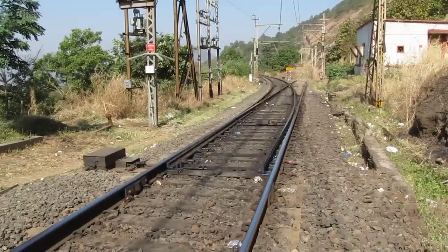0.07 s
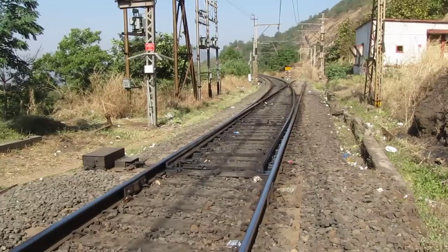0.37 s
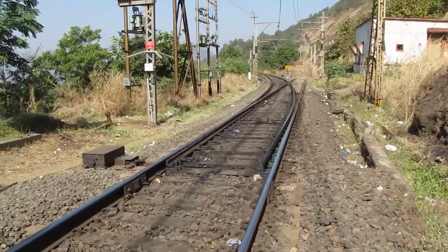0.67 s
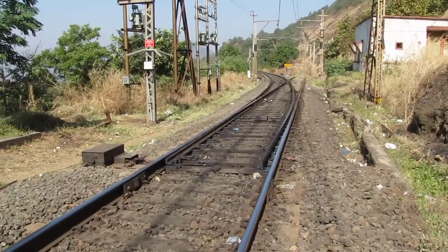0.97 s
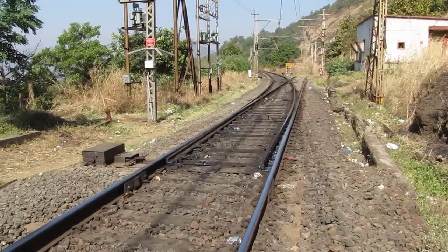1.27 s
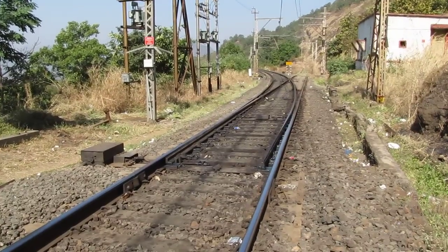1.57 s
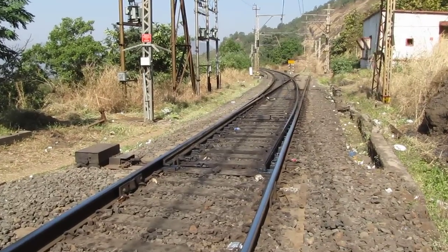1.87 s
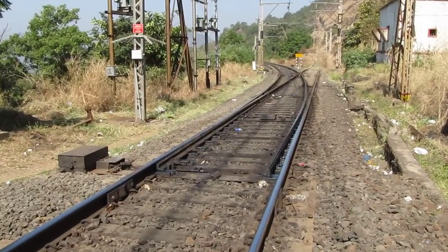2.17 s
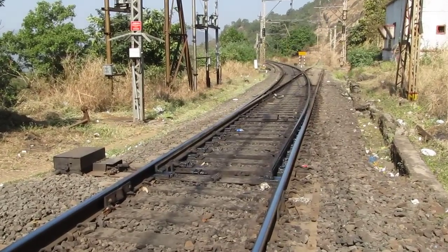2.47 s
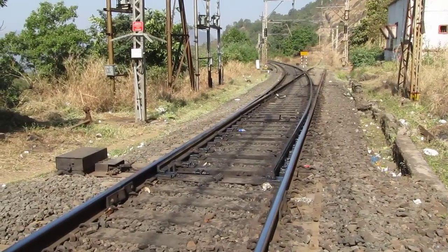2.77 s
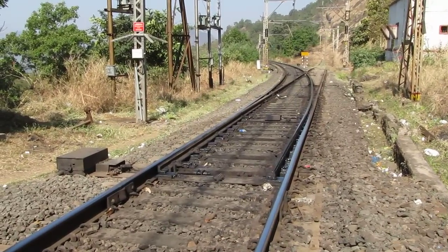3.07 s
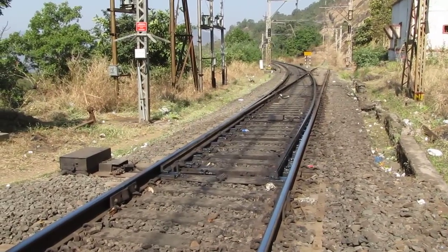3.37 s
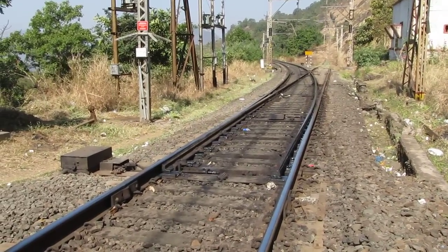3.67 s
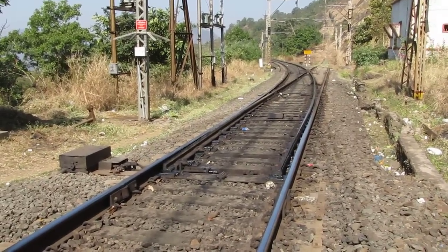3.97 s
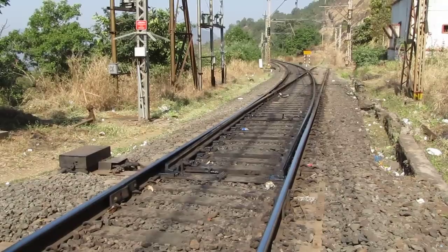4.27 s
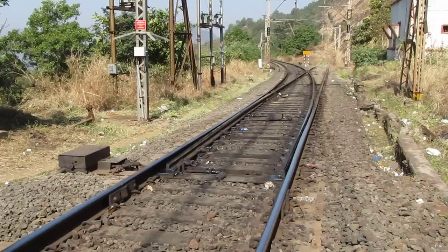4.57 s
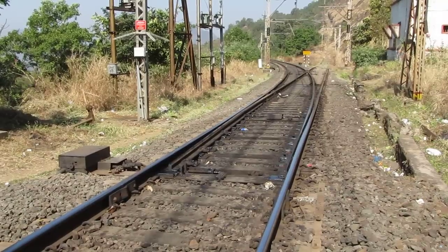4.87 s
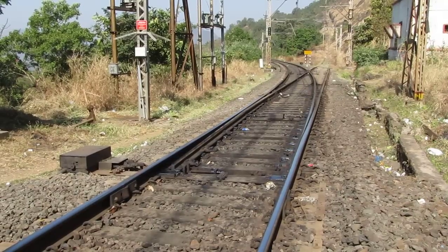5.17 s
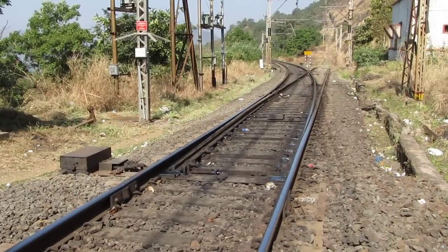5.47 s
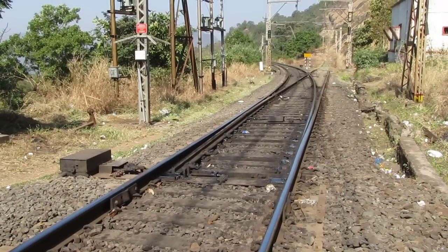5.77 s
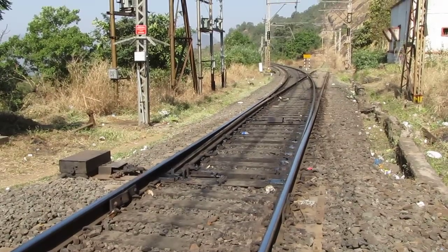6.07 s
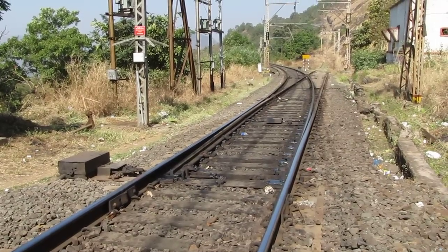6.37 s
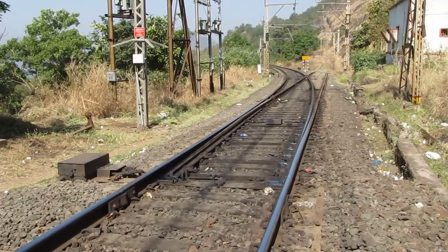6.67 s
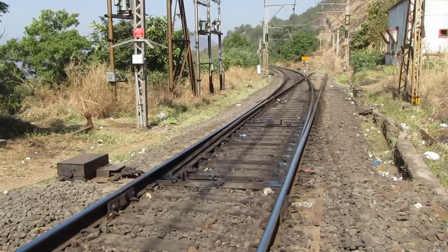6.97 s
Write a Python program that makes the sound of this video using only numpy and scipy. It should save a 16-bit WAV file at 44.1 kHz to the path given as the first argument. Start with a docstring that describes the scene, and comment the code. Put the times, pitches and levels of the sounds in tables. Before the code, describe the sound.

A motorised track switch whirs, labours and locks with steel clacks, over quiet open air, light wind and a bird's rising chirps.

```python
"""At a railway switch in open country, an electric point machine throws the blades: its geared motor runs
up, unlocks them, labours as it drags them across, locks them and is cut off with a steel clack. Meshing
teeth whine, brushes hiss, and the blows of lock and rods ring the steel and thud into the case.
A bird repeats a rising whistle. Underneath lie distant air, insects, rustling grass, mains hum,
breeze on the microphone and a few small handling ticks."""
import sys
import numpy as np
from scipy import signal
from scipy.fft import rfft, irfft, next_fast_len
from scipy.io import wavfile
from scipy.ndimage import uniform_filter1d, map_coordinates

SR = 44100
rng = np.random.default_rng(int(sys.argv[2]) if len(sys.argv) > 2 else 0)


def put_to_file(sound):
    """Save the sound as 16-bit audio at rate SR, in the file named by the first command-line argument."""
    columns = np.atleast_2d(sound).T  # one column per channel
    safe = np.clip(columns, -1, 1)
    whole_steps = np.round(safe * 32767)
    wavfile.write(sys.argv[1], SR, whole_steps.astype(np.int16))


N = 310023
TIME = np.arange(N) / SR
EARS = np.array([[0.5], [-0.5]])  # left and right share of a level or phase offset

# modes of the sheet cover: (frequency [Hz], width [Hz], level [dB])
COVER_MODES = [(1337, 59, 1.5), (1520, 98, 4.5), (2430, 84, -7), (2770, 140, 2.5), (3246, 148, 4.5),
               (4000, 285, -0.5), (4830, 62, -4.5), (5490, 29, 3), (6200, 40, -11), (6720, 50, -9)]
# modes of the case and sleepers: (frequency [Hz], width [Hz], level [dB])
CASE_MODES = [(96.5, 44, -3), (155, 114, -2.5), (216.4, 74.5, 1.5), (239.2, 29.8, 4), (300, 25, -6),
              (360, 18.4, -1), (509, 95, -12.5)]
# blows of lock and rods, levels relative: (time [s], strength [dB], thud [dB],
# treble against strength [dB], chatter [s], case ring [dB])
BLOWS = [(2.919, -32.5, -40, -44, 0.0061, -54), (2.977, -25, -56, -12.5, 0.0013, -58),
         (3.032, -34.5, -48, -49, 0.0032, -38), (3.598, -29, -44, -24, 0.0027, -43.5),
         (5.274, -30.5, -41, -45, 0.004, -67), (5.295, -30, -60, -32, 0.004, -62),
         (5.336, -35.5, -66, -44, .0046, -42.5), (5.377, -42, -61, -28, .003, -62),
         (5.518, -27, -45, -5, 0.0091, -42)]


def amp(db):
    """Decibels to gain."""
    return 10 ** (np.asarray(db) / 20)


def unit(x):
    """Scale to rms 1."""
    return x / np.sqrt(np.mean(x ** 2) + 1e-20)


def along(points, hz):
    """Read (frequency [Hz], value) points on a log axis."""
    freqs, values = np.transpose(points)
    return np.interp(np.log(hz + 1), np.log(np.abs(freqs) + 1), values)


def wobble(rate):
    """A smooth random curve, rate knots a second."""
    return map_coordinates(rng.standard_normal(int(N * rate / SR) + 4), [TIME * rate])


def filtered(x, response):
    """Filter x by a complex response of frequency."""
    size = next_fast_len(N + SR // 2)
    return irfft(rfft(x, size) * response(np.fft.rfftfreq(size, 1 / SR)), size)[..., :N]


def noise(spectrum):
    """Noise of rms 1, coloured by (frequency [Hz], level [dB]) points."""
    return unit(filtered(rng.standard_normal(N), lambda hz: amp(along(spectrum, hz))))


def resonate(x, modes):
    """Play x through a body's resonances, alternating in polarity."""
    return filtered(x, lambda f: sum((-1) ** k * amp(db) * 1j * f * width / (hz**2 - f**2 + 1j * f * width)
                                     for k, (hz, width, db) in enumerate(modes)))


def ringing(modes):
    """Resonant noise of rms 1."""
    return unit(resonate(rng.standard_normal(N), modes))


def add(track, start, sound):
    """Mix a sound into a track at start seconds."""
    part = track[round(start * SR):][:len(sound)]
    part += sound[:len(part)]


def fall(t, t60, attack, hold=0):
    """Envelope of a blow: it rises, and decays after hold seconds."""
    return amp(-60 * np.maximum(t - hold, 0) / t60) * (1 - np.exp(-t / attack))


def spread(a, b, likeness):
    """Mix two unrelated sounds to a stereo pair of given left-right likeness."""
    angle = lambda hz: np.arccos(np.clip(along(likeness, hz), -1, 1)) / 2
    mid, side = filtered(np.array([a, b]), lambda hz: np.array([np.cos(angle(hz)), np.sin(angle(hz))]))
    return np.array([mid + side, mid - side])


def echoes(x):
    """Diffuse answer of ballast, bank and trees; both ears hear nearly the same bass."""
    # outdoor decay: (frequency [Hz], t60 [s])
    decay = [(200, 0.9), (1500, 0.65), (4500, 0.4), (7500, 0.38), (12000, 0.1)]
    # stereo image: (frequency [Hz], left-right likeness [-1..1])
    likeness = [(400, 0.97), (1200, 0.97), (2500, 0.12), (5000, 0)]
    hz, t, bands = signal.stft(rng.standard_normal((2, SR // 2)), SR, nperseg=256)
    bands *= fall(t, along(decay, hz)[:, None], attack=0.014)
    tail = signal.istft(bands, SR, nperseg=256)[1]
    wet = signal.fftconvolve(x[None], tail / np.linalg.norm(tail[0]), axes=1)[:, :N]
    return spread(*wet, likeness)


def distant_air():
    """A wide, gently breathing bed of far-off air."""
    # colour of the air: (frequency [Hz], level [dB])
    colour = [(53, -32), (90, 8.5), (107, -10), (124, -12.5), (289, -10), (400, -15.5), (436, -12.5),
              (508, -12), (658, -8.5), (930, -13.5), (1210, -17), (2210, -20.5), (4610, -24.5), (5600, -25),
              (15800, -45.5)]
    # stereo image: (frequency [Hz], left-right likeness [-1..1])
    likeness = [(60, -0.86), (150, 1), (380, 0.72), (950, 0.73), (2380, 0.062), (5980, -0.62),
                (15000, 0.22)]
    return amp(-64.5 + 0.43 * wobble(2.28)) * spread(noise(colour), noise(colour), likeness)


def insects():
    """A thin drone in one narrow, high band."""
    return amp(-86.5) * np.array([ringing([(5690, 120, 0)]) for ear in range(2)])


def mains_hum():
    """One steady low tone, mostly on the left."""
    return np.sqrt(2) * np.sin(2 * np.pi * 49.75 * TIME) * amp([[-47], [-64]])


def grass():
    """Dry grass is brushed aside: a high swish, then a longer rustle of stalks."""
    # colours of the swish and the stalks: (frequency [Hz], level [dB])
    swish_colour = [(1000, -31), (3700, -19), (4600, 14), (5300, -7), (6500, -21), (15000, -34)]
    stalk_colour = [(400, -14), (1200, -2.5), (2900, 0), (3800, -6), (5000, -12), (15000, -42)]
    since = np.maximum(TIME - 0.885, 0)
    swish = amp(-71) * fall(since, t60=0.99, attack=0.02)
    stalks = amp(-56.5) * fall(since, t60=1.7, attack=0.16)
    flicker = amp(1.3 * wobble(90))
    rustle = [swish * noise(swish_colour) + stalks * noise(stalk_colour) for ear in range(2)]
    return flicker * np.array(rustle)


def breeze():
    """A light draught never stops; gusts swell, fade and buffet mostly the left microphone port."""
    # gusts: (peak time [s], half width [s], relative level [dB])
    gusts = [(1.15, 0.18, -55), (1.52, 0.069, -64), (3.9, .3, -68), (4.88, 0.083, -56), (5.13, 0.07, -58),
             (5.932, 0.016, -47), (6.09, 0.067, -42.5), (6.6, 0.22, -56), (6.92, .09, -45.5)]
    # colours of buffeting and draught: (frequency [Hz], level [dB])
    buffet_colour = [(12, -48), (20, 2.5), (43, -1), (93, 0), (201, -19), (270, -25.5), (303, -34),
                     (499, -42), (600, -48), (780, -85), (1320, -120)]
    draught_colour = [(15, -3.5), (35, -15.5), (70, 11.5), (140, -15.5), (400, -54), (1500, -120)]
    swell = sum(amp(db) * np.exp(-((TIME - peak) / width) ** 2 / 2) for peak, width, db in gusts)
    left, right = [unit(noise(buffet_colour) * amp(2.1 * wobble(18))) for port in range(2)]
    draught = amp([[-66], [-76]]) * np.array([noise(draught_colour) for port in range(2)])
    return draught + swell * np.array([amp(9) * left, amp(-23.5) * right + amp(-16) * left])


def handling_ticks():
    """Dry little clicks with a brief hollow ring; each contact's ring balance sets how much of it rings and how
    much snaps."""
    # contacts: (time [s], relative level [dB], ring pitch [Hz], ring balance [dB])
    contacts = [(1.013, -48, 1170, -7), (1.266, -56, 1160, -6), (1.368, -45.5, 900, -4),
                (1.696, -51, 1180, -4.5), (2.283, -46.5, 896, -4.5), (2.417, -50, 1212, 1),
                (5.847, -55, 1550, -21)]
    # colour of the snap: (frequency [Hz], level [dB])
    snap_colour = [(300, 5), (800, 7), (2000, 0.5), (3300, 0), (4700, -5.5), (6000, -19), (15000, -33)]
    t = np.arange(SR // 5) / SR
    snap, ring = np.zeros((2, N))
    for start, db, hz, ring_db in contacts:
        hardness = 1 - 0.95 * amp(2 * ring_db)
        add(snap, start, amp(db + 1) * hardness * fall(t, t60=0.03, attack=0.0007))
        phase = 2 * np.pi * hz * t + 0.63 * wobble(200)[:len(t)]
        add(ring, start, amp(db + ring_db + 5) * fall(t, t60=0.045, attack=0.002) * np.sin(phase))
    return snap * noise(snap_colour) + ring


def bird():
    """A buzzy lead-in slides up into a clean whistle that echoes from the trees."""
    # calls, levels relative: (time [s], length [s], whistle [dB], loudest point [share of length],
    # buzz [0..1], lead-in [dB], lead-in pitch [Hz], glide knee [share of length], knee pitch [Hz])
    calls = [(1.813, 0.13, -55.5, .55, 1, -65.5, 4010, 0.87, 5150),
             (2.976, .12, -55, 0.94, .25, -74, 4240, 0.72, 4910),
             (4.24, 0.17, -56, 0.27, 0.4, -65, 3950, .5, 5000),
             (5.161, .125, -51, 0.5, 0.5, -72, 4305, .7, 5030),
             (6.654, 0.12, -53, 0.37, 0.46, -57, 4390, .5, 4880)]
    lead_s, swell_s, release_s, taper_db = 0.05, 0.018, 0.01, 9.5
    start_hz, top_hz = 4370, 5480
    trill_rate, trill_depth_hz, rasp_depth_hz = 85, 187, 190
    song = np.zeros(N)
    for start, length, db, loudest, buzz, lead_db, lead_hz, knee, knee_hz in calls:
        t = np.arange(-lead_s, length, 1 / SR)
        onset = np.clip(t / swell_s + 0.5, 0, 1)
        progress = np.clip(t / length, 0, 1)
        rough = 1 - onset + onset * buzz * (1 - progress)
        glide_hz = np.interp(progress, [0, knee, 0.88], [start_hz, knee_hz, top_hz])
        pitch_hz = lead_hz * (1 - onset) + onset * glide_hz
        trill = trill_depth_hz * np.sin(2 * np.pi * trill_rate * t)
        rasp = rasp_depth_hz * wobble(1100)[:len(t)]
        phase = 2 * np.pi * np.cumsum(pitch_hz + rough * (trill + rasp)) / SR
        voice = np.sin(phase) + amp(-37) * np.sin(3 * phase)
        lead_in = amp(lead_db) * (1 + t / lead_s) * (1 - onset)
        taper = np.interp(progress, [0, loudest, 1], [1, 0, 1])
        whistle = amp(db - taper_db * taper ** 2) * onset * np.clip((length - t) / release_s, 0, 1)
        flicker = amp((2.1 + 1.2 * rough) * wobble(200)[:len(t)])
        add(song, start - lead_s, np.sqrt(2) * (lead_in + whistle) * flicker * voice)
    direct = filtered(song, lambda hz: amp(EARS * 0.5) * np.exp(1j * EARS * hz / 4500))
    return direct + amp(-12) * echoes(song)


def running(t60):
    """Envelope of the gear train: it starts, runs, and dies away once the current is cut."""
    switch_on_s, run_up_s, cut_off_s = 2.5, 0.18, 5.52
    run_up = np.clip((TIME - switch_on_s) / run_up_s, 0, 1)
    return run_up * amp(-60 * np.maximum(TIME - cut_off_s, 0) / t60)


def stage_levels(blend_s=0.13):
    """Level curves of the motor's layers, crossfaded through the stages of the throw."""
    # run-up, unlocking, running free, taking up the blades, dragging, straining, sliding home, locking;
    # levels relative: (start [s], grinding [dB], brushes [dB], rumble [dB], mesh tones 1, 2, 3 [dB])
    stages = [(2.5, -63, -75.5, -60.5, -0.5, -8, -7.5), (2.78, -58, -64, -66.5, -1.5, 4, 4.5),
              (3.12, -58, -67.5, -67, -5, 1.5, -6), (3.6, -55, -67.5, -62, 3.5, 6.5, 1.5),
              (3.819, -62, -71.5, -66.5, -0.5, -1.5, -1), (4.33, -63, -72, -67, -1.5, -1, 1.5),
              (4.64, -61.5, -73.5, -65.5, -1, -3.5, -1), (5.17, -55.5, -63, -62, -1.5, -0.5, 3.5)]
    starts, *levels = np.transpose(stages)
    stage = np.maximum(np.searchsorted(starts, TIME) - 1, 0)
    return [uniform_filter1d(db[stage], int(blend_s * SR)) for db in levels]


def grinding():
    """Tiny irregular tooth and brush contacts ring the cover and shake the case."""
    # colours of teeth and motor brushes: (frequency [Hz], level [dB])
    tooth_colour = [(260, -44), (450, -38.5), (573, -9), (624, -13), (662, -9), (728, -18.5), (794, -11),
                    (1100, -21.5), (1260, -19.5), (1590, -15.5), (1730, -14.5), (2380, -13.5), (3270, -51),
                    (3570, -39), (4500, -33), (5850, -64), (9900, -120)]
    brush_colour = [(2350, -29), (4000, -13), (4390, -4.5), (4770, 1), (5220, -1.5), (5360, -0.5),
                    (5700, -5), (5890, -4), (6510, -13.5), (9270, -20), (15000, -68)]
    grind_db, brush_db, rumble_db, *_ = stage_levels()
    contacts = lambda: rng.standard_normal(N) * amp(1.5 * wobble(220))
    cover = amp(grind_db - 4) * unit(resonate(contacts(), COVER_MODES))
    teeth = amp(grind_db - 1.5 + 0.88 * wobble(150)) * noise(tooth_colour)
    brushes = amp(brush_db - 1 + 1.6 * wobble(150)) * noise(brush_colour)
    case = amp(rumble_db + 2.5) * unit(resonate(contacts(), CASE_MODES))
    return (cover + teeth + brushes + case) * running(t60=0.61)


def gear_whine():
    """Gear teeth mesh at a rate that sags under load; uneven teeth make the tones flutter."""
    # motor speed: (time [s], mesh rate [Hz])
    speed = [(2.56, 469), (2.69, 649), (2.82, 745.8), (2.97, 794.4), (3.04, 846), (3.3, 913.5), (3.6, 947),
             (3.74, 802.7), (3.95, 697), (4.09, 653.6), (4.24, 655.3), (4.4, 627), (4.55, 619.5),
             (4.68, 690), (5.11, 695), (5.25, 772), (5.51, 819.5), (5.575, 652), (5.63, 639)]
    # gearbox resonances that the mesh tones sweep through: (frequency [Hz], level [dB])
    gearbox = [(500, -62), (610, -54), (655, -46.5), (692, -50), (722, -65.5), (785, -54.5), (880, -70),
               (1240, -58), (1400, -66), (1540, -58), (1620, -56), (1740, -64), (1950, -66), (2120, -60.5),
               (2270, -54.5), (2430, -57.5), (2600, -73)]
    # weaker gear tones and high tooth overtones: (pitch [times mesh rate], relative level [dB])
    side_tones = [(.28, -31), (.405, -10), (1.33, -16), (2.65, -4.5), (2.83, -21), (3.79, -17),
                  (3.55, -14.5), (3.97, -6.5)]
    overtones = [(4.96, -7), (5.96, -9.5), (6.93, -4), (7.7, -18)]
    times, rates = np.transpose(speed)
    mesh_hz = np.interp(TIME, times, rates)
    first_db, second_db, third_db = [along(gearbox, k * mesh_hz) for k in (1, 2, 3)]
    grind_db, brush_db, _, lift1_db, lift2_db, lift3_db = stage_levels()
    phase = 2 * np.pi * np.cumsum(mesh_hz * (1 + 0.00276 * wobble(60))) / SR

    def tone(multiple, db, rough, rate):
        """One partial, fluttering in level and phase."""
        jitter = 1 + rough * (wobble(rate) + 1j * wobble(rate))
        return np.sqrt(2) * amp(db) * np.real(np.exp(1j * multiple * phase) * jitter)

    # the teeth run smoothly under heavy load and rattle when the gears spin freely
    slack = np.interp(mesh_hz, [650, 800], [0.35, 0.5])
    upper = tone(2, second_db + lift2_db - 4.5, slack, rate=68)
    upper += tone(3, third_db + lift3_db - 7, slack, rate=73)
    upper += sum(tone(k, grind_db + db - 6.5, slack, rate=73) for k, db in side_tones)
    # high overtones light up as they sweep through the resonances of the cover
    high = sum(tone(k, brush_db + db + 23, slack, rate=120) for k, db in overtones)
    upper += resonate(slack ** 3 * high, COVER_MODES)
    flutter = np.minimum(0.19 * amp(-(first_db + 48) / 2), 0.45) + 0.4 * (1 - running(t60=0.1))
    waver_db = wobble(14)  # the load varies
    main = tone(0.99, first_db + lift1_db - waver_db, flutter, rate=70)
    gate = np.clip(np.minimum(TIME - times[0], times[-1] - TIME) / 0.012, 0, 1)
    return (main * running(t60=0.6) + upper * running(t60=0.13)) * gate


def case_ring(mode_hz=368.5):
    """The blows leave the main mode of the case humming for a moment."""
    t = np.arange(SR // 2) / SR
    hum = np.zeros(N)
    for start, *_, db in BLOWS:
        phase = 2 * np.pi * mode_hz * t + 0.32 * wobble(48)[:len(t)]
        add(hum, start, amp(db) * fall(t, t60=0.22, attack=0.027) * np.sqrt(2) * np.sin(phase))
    return hum


def clacks():
    """Each blow chatters briefly, rings the steel and thuds into the case; treble arrives first."""
    # colours of a blow's body and its sharp crack: (frequency [Hz], level [dB])
    body_colour = [(240, -23), (400, -23), (562, -10), (834, 7), (1070, -5.5), (1880, -2), (2210, 1.5),
                   (3390, -5.5), (4050, -15), (5500, -16), (7150, -22), (12100, -120)]
    crack_colour = [(1650, -58), (2800, -4.5), (3500, -2.5), (4100, -1.5), (5000, -26), (6000, -4),
                    (6900, -3.5), (7700, -11), (9700, -13), (10300, -23), (12000, -31), (15500, -58)]
    # modes of lock and rods: (frequency [Hz], width [Hz], level [dB])
    steel_modes = [(1217, 48, 4.5), (2240, 120, 2.5), (2420, 44, -18), (2780, 110, 10.5), (3400, 30, -3),
                   (3660, 42, -7.5), (4330, 59, -23), (4500, 110, 11), (5850, 170, -9.5), (5560, 25, -19),
                   (5570, 28, 20), (6360, 23, -20), (6400, 39, -17), (6950, 60, -24), (7000, 80, -14),
                   (7500, 60, -14), (8700, 15.85, -39), (9790, 29, -31)]
    t = np.arange(SR // 2) / SR
    body, crack, thud, ring = np.zeros((4, N))
    for start, db, thud_db, treble_db, chatter_s, _ in BLOWS:
        blow = lambda t60, attack: fall(t, t60, attack, hold=chatter_s)
        add(body, start, amp(db - 12.5) * blow(t60=0.13, attack=0.00079))
        add(crack, start, amp(db + treble_db - 1.5) * blow(t60=0.05, attack=0.000082))
        add(thud, start, amp(thud_db + 1) * blow(t60=0.29, attack=0.008))
        clang = blow(t60=0.049, attack=0.00037) + 0.12 * blow(t60=0.15, attack=0.0028)
        add(ring, start, amp(db + treble_db / 2 - 5.5) * clang)
    impact = body * noise(body_colour) + crack * noise(crack_colour)
    return impact + thud * ringing(CASE_MODES) + ring * ringing(steel_modes)


def point_machine():
    """Whine, grinding and blows, a few metres ahead and to the left, with their outdoor echo."""
    # width of the rattle: (frequency [Hz], left-right likeness [-1..1])
    likeness = [(60, 0.47), (150, 1), (380, 1), (950, 0.99), (2380, 1), (5980, 0.99), (15000, 0.47)]
    # pan: (frequency [Hz], left over right [dB])
    pan = [(700, 0.4), (1300, 1), (2400, -6.5), (4400, 2.5), (8000, 2.5)]
    # arrival at the ears, eased out below 1500 Hz: (frequency [Hz], left lead [rad])
    phase_lead = [(0, 0), (2500, .4), (3450, 1.8), (5510, 1.15), (7000, 1.3), (9000, 1.4), (12300, 2.6),
                  (15000, 3)]
    tones = gear_whine() + case_ring()
    rattle = [grinding() + clacks() for ear in range(2)]
    pair = tones + spread(*rattle, likeness)
    lead = lambda hz: along(phase_lead, hz) * hz ** 2 / (hz ** 2 + 1500 ** 2)
    direct = filtered(pair, lambda hz: amp(EARS * along(pan, hz)) * np.exp(1j * EARS * lead(hz)))
    return direct + amp(-19) * echoes(tones) + amp(-16) * echoes(rattle[0])


def scene():
    """The trackside mix, in stereo."""
    events = point_machine() + bird() + handling_ticks()
    return events + breeze() + distant_air() + insects() + grass() + mains_hum()


def record(dry):
    """Fade in quickly after a moment of silence and cut the top treble."""
    fade_in = np.clip((TIME - 0.028) / 0.008, 0, 1)
    return filtered(dry * fade_in, lambda hz: hz < 15800)


dry = scene()
out = record(dry)
put_to_file(out)
```